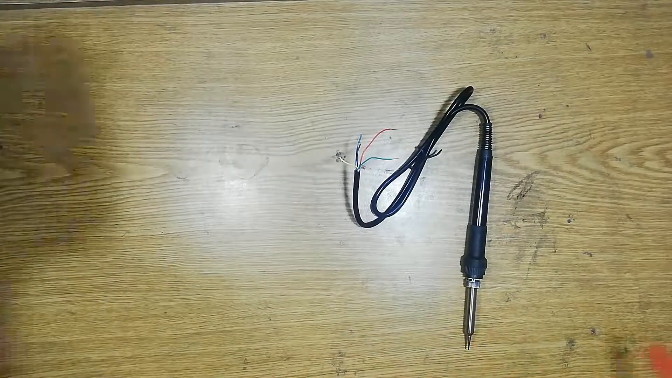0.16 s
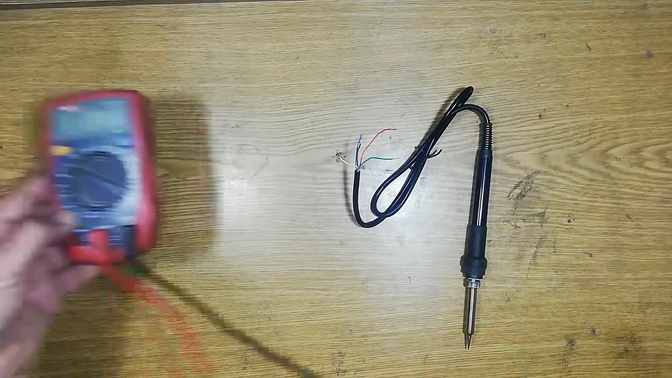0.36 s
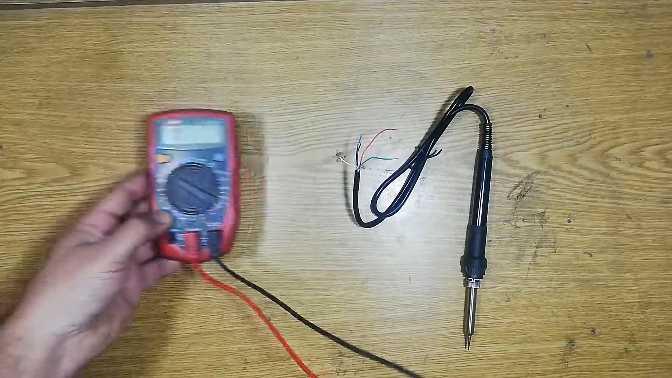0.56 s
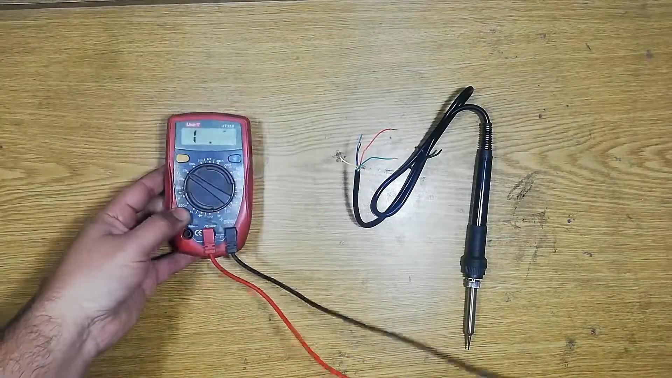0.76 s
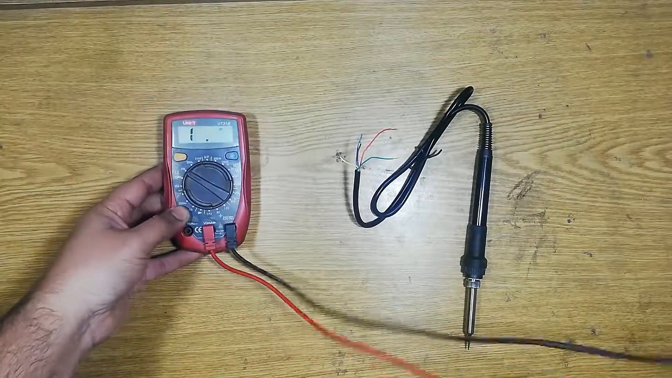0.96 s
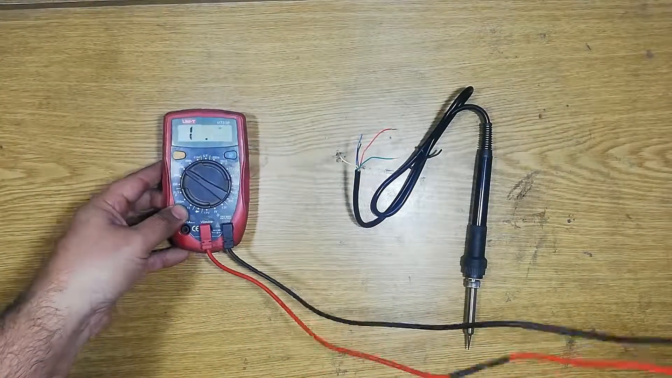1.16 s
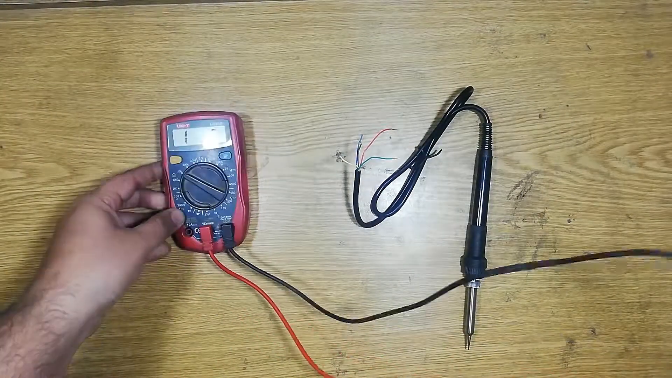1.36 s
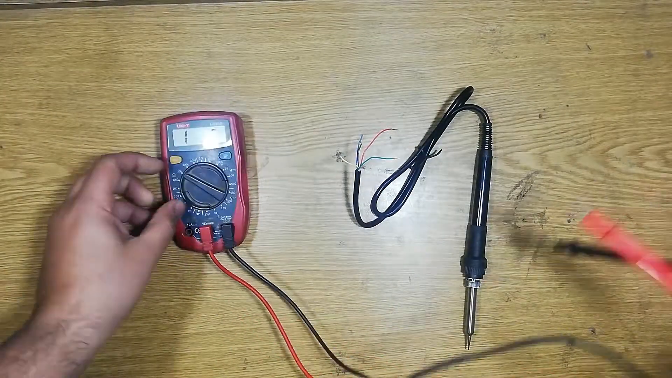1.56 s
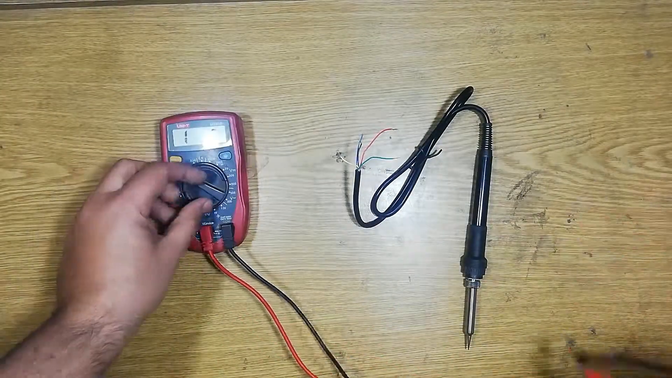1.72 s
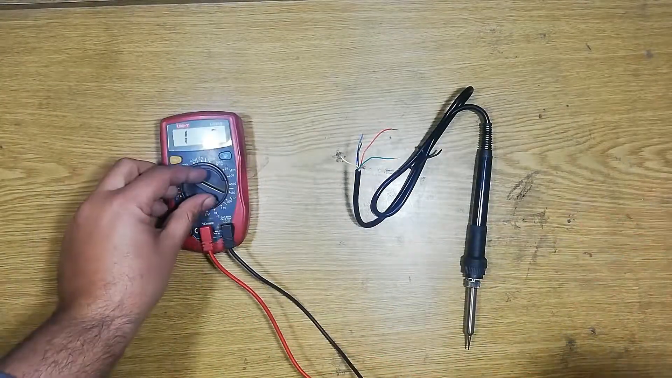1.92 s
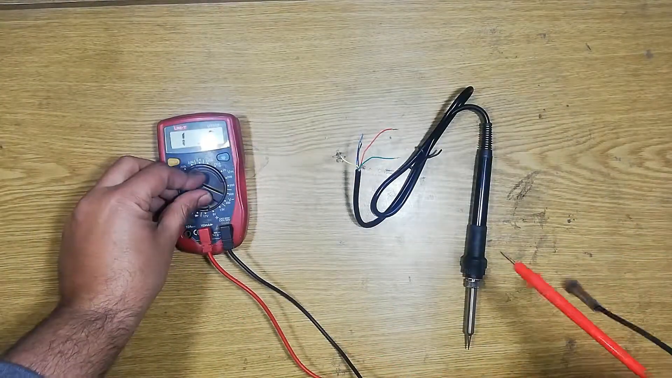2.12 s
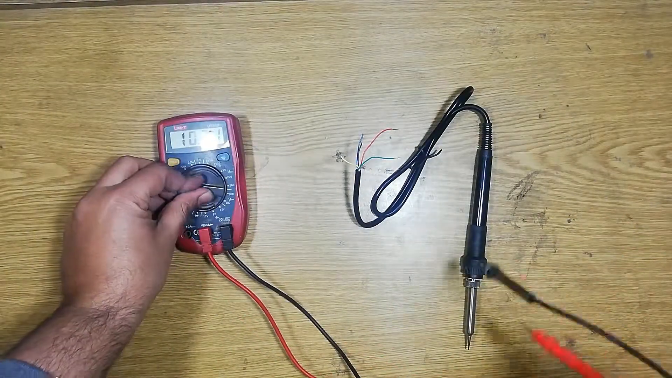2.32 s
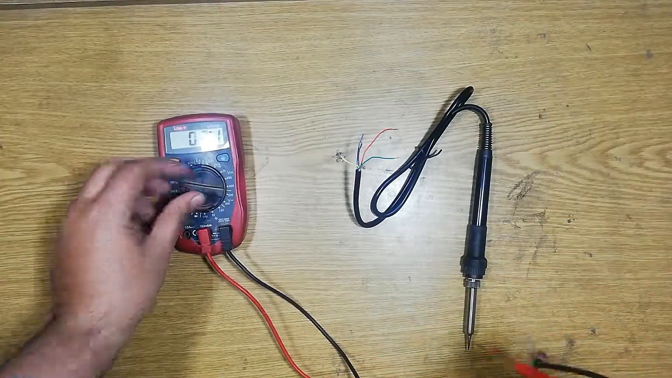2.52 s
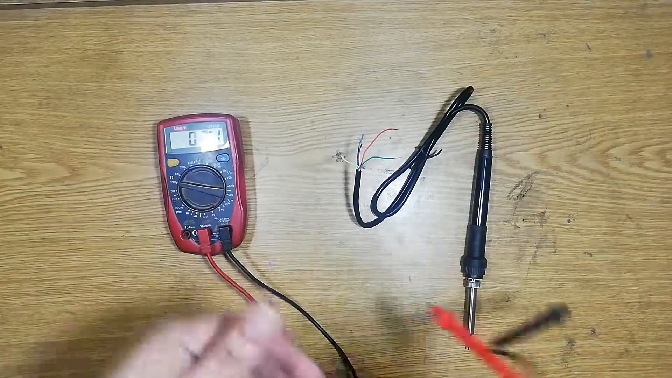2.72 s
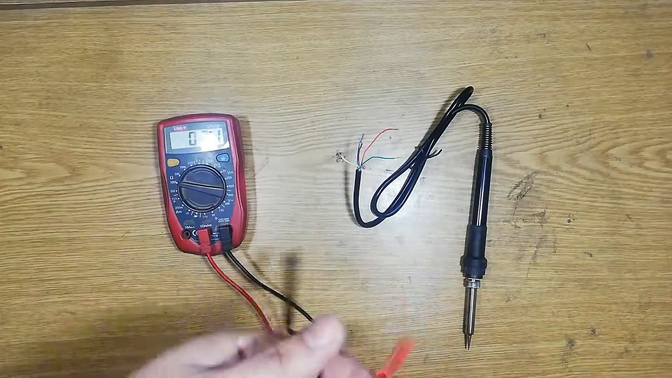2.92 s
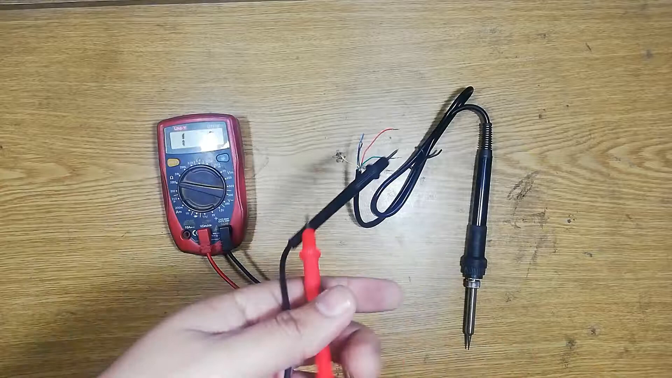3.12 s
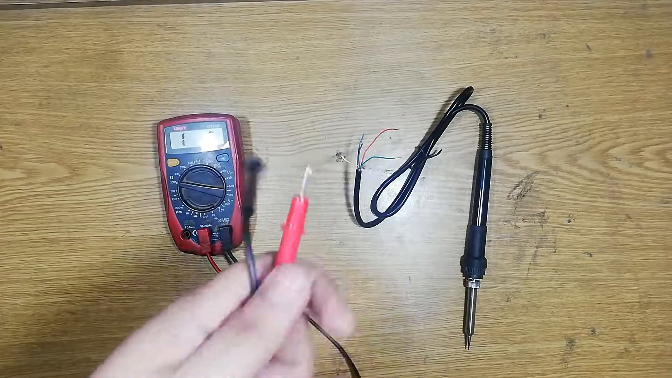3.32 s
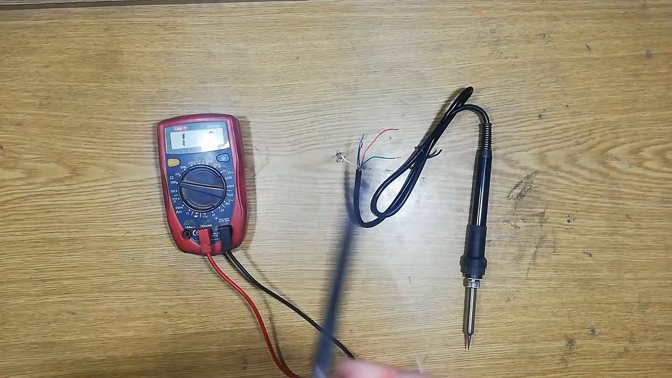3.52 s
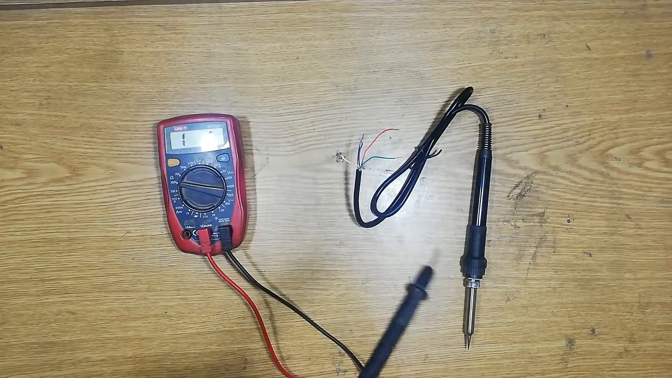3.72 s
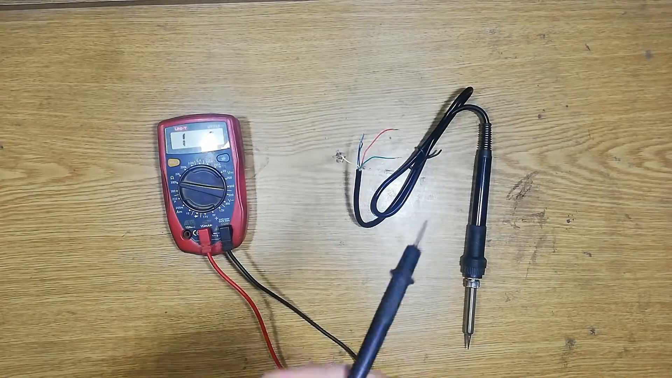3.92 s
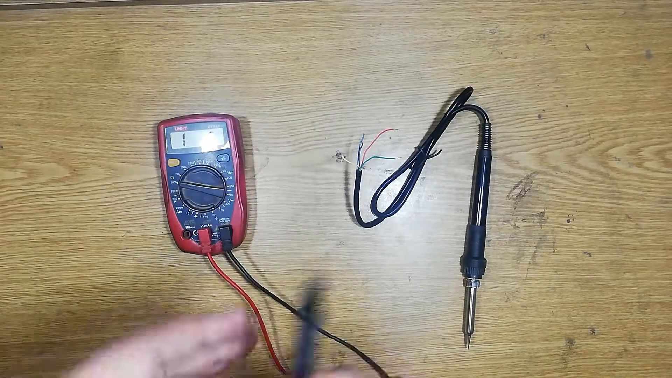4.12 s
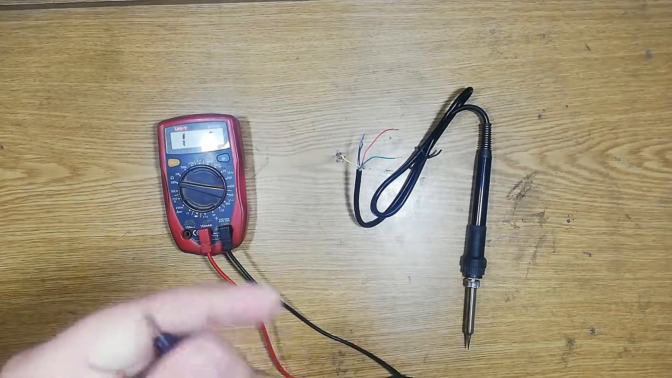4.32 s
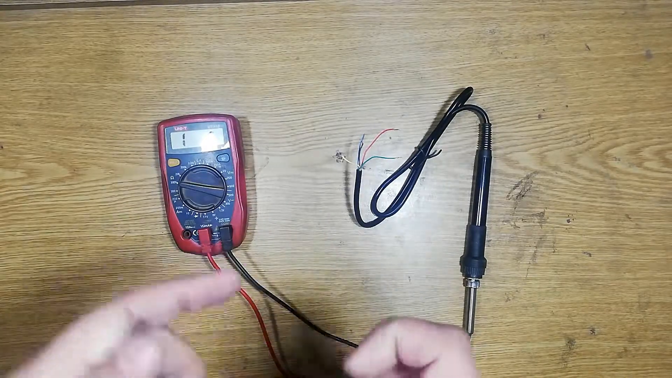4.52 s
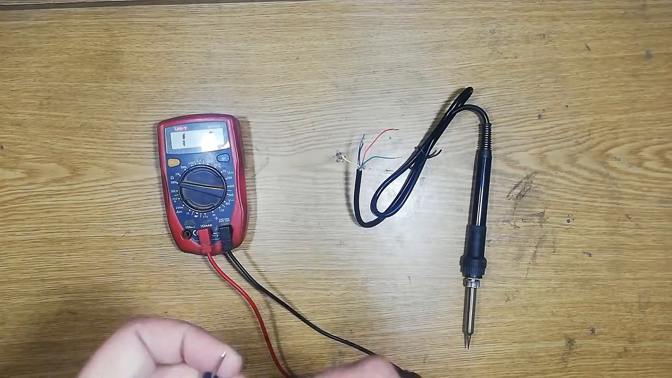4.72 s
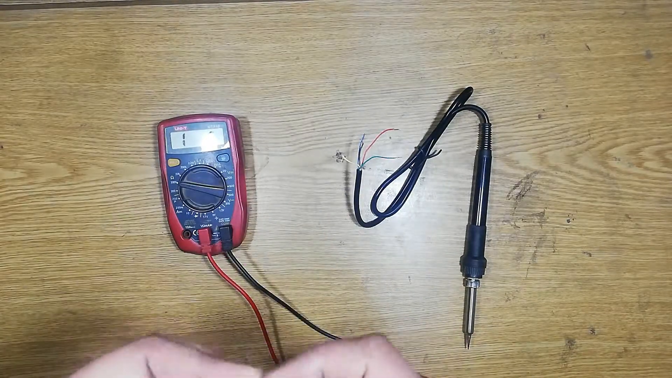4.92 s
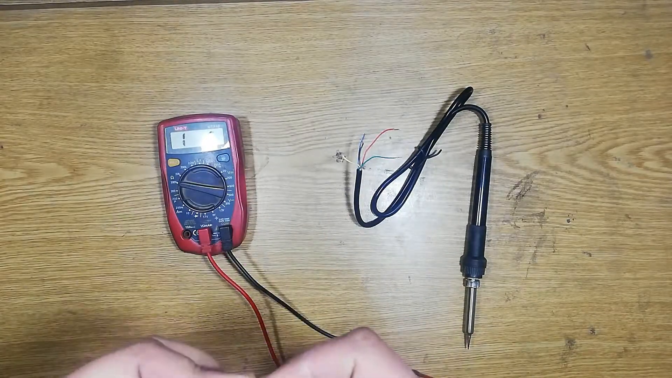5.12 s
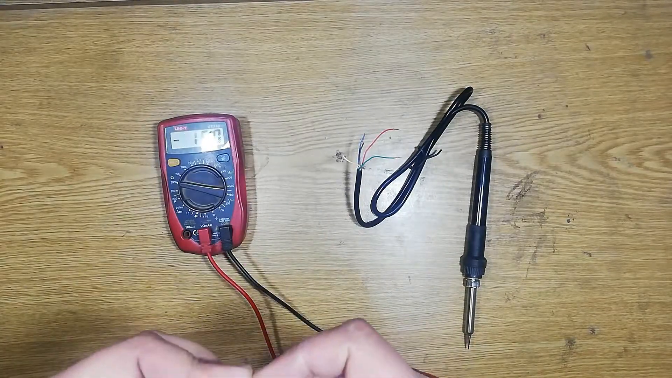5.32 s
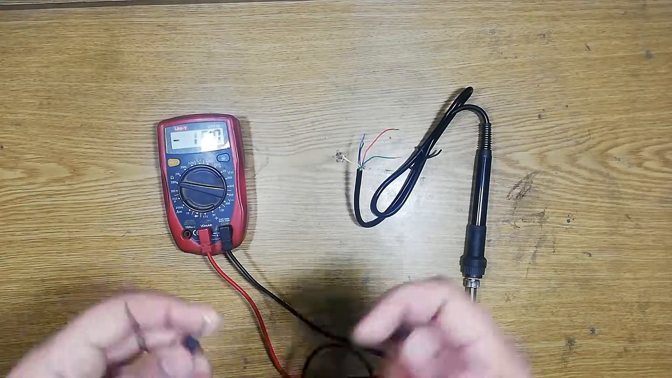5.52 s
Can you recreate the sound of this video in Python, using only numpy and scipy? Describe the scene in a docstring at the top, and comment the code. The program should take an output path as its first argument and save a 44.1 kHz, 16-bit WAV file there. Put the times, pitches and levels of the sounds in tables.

```python
"""A multimeter is set down on a wooden table and shoved: two booming knocks that overload the microphone.
The steel tips of its two dangling probes clink together; their plastic grips and the dial's detents snap.
Fingers and leads rub faintly over plastic. A small, hard room hums and reverberates.
Every sound arrives as a quick rising flam."""
import sys
import numpy as np
from scipy import signal
from scipy.fft import rfft, irfft, next_fast_len
from scipy.io import wavfile
from scipy.ndimage import uniform_filter1d

SR = 44100
rng = np.random.default_rng(int(sys.argv[2]) if len(sys.argv) > 2 else 0)


def digitize_waveform(pressure):
    """Quantize a signal to 16-bit integers and store it at the path in sys.argv[1].

    Rows of a 2-D input are taken as channels; values are limited to [-1, 1].
    """
    field = np.atleast_2d(pressure).T
    bounded = np.clip(field, -1, 1)
    quanta = np.round(bounded * 32767).astype(np.int16)
    wavfile.write(sys.argv[1], SR, quanta)


N = 245267
T = np.arange(SR * 2 // 5) / SR  # time axis of one event, s


def amp(db):
    """Decibels to gain."""
    return 10 ** (np.asarray(db) / 20)


def unit_rms(x):
    """Scale to rms 1."""
    return x / np.sqrt(np.mean(x ** 2) + 1e-20)


def curve(points, hz):
    """Interpolate (freq_hz, value) points on a log frequency axis."""
    freqs_hz, values = np.transpose(points)
    return np.interp(np.log(hz + 1), np.log(freqs_hz + 1), values)


def filtered(x, response):
    """Apply the gain response(hz) by FFT."""
    size = x.shape[-1]
    padded = next_fast_len(size + 2048)
    hz = np.fft.rfftfreq(padded, 1 / SR)
    return irfft(rfft(x, padded) * response(hz), padded)[..., :size]


def decay(t60_s):
    """Envelope falling 60 dB in t60_s."""
    return np.exp(-np.log(1000) * T / t60_s)


def ring(hz, t60_s, attack_s=0.0004):
    """A short-wave mode, reaching each channel at its own phase."""
    onset = 1 - np.exp(-(T / attack_s) ** 2)
    return np.sin(2 * np.pi * (hz * T + rng.random((2, 1)))) * decay(t60_s) * onset


def add(track, start_s, sound, pan_db=0):
    """Mix in a stereo sound; pan_db is left over right."""
    start = round(start_s * SR)
    part = sound[:, max(-start, 0):N - start] * amp([[pan_db / 2], [-pan_db / 2]])
    track[:, max(start, 0):][:, :part.shape[1]] += part


# left-right likeness: freq_hz, correlation
STEREO_CORRELATION = [(100, 0.99), (250, 0.91), (500, 0), (1500, 0.77), (4000, 0)]

def stereo_noise(response, size=len(T)):
    """Coloured noise of rms 1, its channels most alike in the bass."""
    def mid_side_gains(hz):
        angle = np.arccos(np.clip(curve(STEREO_CORRELATION, hz), -1, 1)) / 2
        return response(hz) * [np.cos(angle), np.sin(angle)]

    mid, side = filtered(rng.standard_normal((2, size)), mid_side_gains)
    return unit_rms(np.array([mid + side, mid - side]))


# quiet room spectrum: freq_hz, density_db
HUM_SPECTRUM = [(15, -40.5), (25, -18), (53, -3.5), (86, -15.5), (118, -1), (150, -18), (176, -11),
                (354, -23.5), (475, -32.5), (1120, -27.5), (1390, -32.5), (1760, -30), (3630, -34.5),
                (4040, -32.5), (15000, -39.5)]

def room_hum(level_db=-56.5):
    """The room's steady low noise."""
    return amp(level_db) * stereo_noise(lambda hz: amp(curve(HUM_SPECTRUM, hz)), N)


# reverberation time: freq_hz, t60_s
ROOM_DECAY = [(200, 0.25), (2500, .3), (7000, 0.27), (12000, 0.24), (16000, 0.49)]

def in_room(sound, wet_db, build_s=0.00057):
    """Add a diffuse tail, new for each sound since the source keeps moving."""
    hz, t, spectra = signal.stft(rng.standard_normal((2, len(T))), SR, nperseg=256)
    spectra = spectra * np.exp(-np.log(1000) * t / curve(ROOM_DECAY, hz)[:, None])
    tail = signal.istft(spectra, SR, nperseg=256)[1][:, :len(T)]
    tail *= 1 - np.exp(-(T / build_s) ** 2)
    tail /= np.linalg.norm(tail[0])
    return sound + amp(wet_db) * signal.fftconvolve(sound, tail, axes=1)[:, :len(T)]


# rubs on plastic: peak_s, level_db, sigma_s, centre_hz
RUB_EVENTS = [(0.661, -59, .13, 1886), (1.809, -60, 0.061, 2030), (2.457, -40, .025, 2041),
              (4.352, -60.5, .035, 12170), (4.516, -59.5, 0.043, 11830), (4.759, -64.5, 0.13, 1840)]

def plastic_rubs(half_width_oct=0.25, grain_db=3):
    """Fingers and leads slide over plastic: swells of hiss, grainy with tiny slips."""
    track = np.zeros((2, N))
    t = np.arange(-SR // 3, SR // 3) / SR
    for peak_s, level_db, sigma_s, centre_hz in RUB_EVENTS:
        band = lambda hz: 1 / (1 + (np.log2((hz + 1) / centre_hz) / half_width_oct) ** 2)
        hiss = stereo_noise(band, len(t))
        slips = unit_rms(uniform_filter1d(rng.standard_normal(len(t)), size=200))
        rub = unit_rms(hiss * amp(grain_db * slips))
        swell = np.exp(-(t / sigma_s) ** 2 / 2)
        add(track, peak_s + t[0], amp(level_db) * rub * swell)
    return track


def burst(low_hz, high_hz, t60_s=0.022):
    """A band of quickly decaying noise."""
    band = signal.butter(N=4, Wn=[low_hz, high_hz], btype="band", fs=SR, output="sos")
    noise = signal.sosfilt(band, rng.standard_normal((2, len(T))) * decay(t60_s))
    return noise * np.linalg.norm(decay(t60_s)) / np.linalg.norm(noise, axis=1, keepdims=True)


# dial detents and probe grips: start_s, level_db, mode_hz, ring_db, top_hz, pan_db
SNAP_EVENTS = [(1.9479, -31, 4140, -10, 10440, -8.5), (2.3037, -7.5, 2150, 0, 6000, -2.5),
               (2.3046, -6.5, 3590, -5.5, 12000, -2.5), (2.6045, -25, 2904, 9, 4890, -1),
               (2.7635, -33, 2050, 1.5, 2406, 1.5), (2.806, -28.5, 2350, -10.5, 9583, 4.5),
               (3.352, -14.5, 4704, -11, 10300, -2.5), (3.3525, -17.5, 2010, 1, 2550, -5),
               (3.981, -32, 4523, -5, 8110, 5.5), (4.9375, -23, 9815, -16, 13560, -4.5),
               (5.4952, -22, 4850, 9.5, 8606, -1.5)]

def plastic_snaps(gain_db=3, thud_db=-1.5, thud_db_per_db=2.4, wet_db=-7, wet_db_per_oct=5):
    """Dense, damped plastic modes, the lowest ringing; the loudest snaps overload into a short low thud."""
    track = np.zeros((2, N))
    for start_s, level_db, mode_hz, ring_db, top_hz, pan_db in SNAP_EVENTS:
        snap = burst(0.88 * mode_hz, top_hz) + amp(ring_db) * ring(mode_hz, t60_s=0.012)
        low_thud = in_room(burst(low_hz=170, high_hz=2000), wet_db=-12)
        low_thud *= amp(thud_db + thud_db_per_db * level_db)
        room_db = wet_db + wet_db_per_oct * np.log2(top_hz / mode_hz)  # broad snaps fill the room more
        add(track, start_s, amp(level_db + gain_db) * in_room(snap, room_db) + low_thud, pan_db)
    return track


# modes of the two steel tips: pitch_hz, level_db, t60_s
FIRST_TIP_MODES = [(3106, 0.5, 0.017), (5106, -2, 0.014), (7564, 5.5, 0.013), (11063, 1, 0.024),
                   (14954, -22.5, 0.024)]
SECOND_TIP_MODES = [(8085, 0, 0.032), (11620, 0.002, .02)]

def steel_tips(second_tip_db, lowest_hz, tilt_db_per_oct, pivot_hz=9000, detune=0.022):
    """Both tips ring in close mode pairs; a touch near the point leaves the low modes still."""
    first, second = np.zeros((2, 2, len(T)))
    for tip, modes in (first, FIRST_TIP_MODES), (second, SECOND_TIP_MODES):
        for hz, level_db, t60_s in modes:
            tilt_db = tilt_db_per_oct * np.log2(max(hz, lowest_hz) / pivot_hz)
            low_cut = 1 / np.hypot(1, (lowest_hz / hz) ** 4)
            lower_hz, upper_hz = hz * (1 + detune * rng.random(2) * [-1, 1])
            pair = (ring(lower_hz, t60_s) + ring(upper_hz, t60_s)) / np.sqrt(2)
            tip += amp(level_db + tilt_db) * low_cut * pair
    return (first + amp(second_tip_db) * second) / np.hypot(1, amp(second_tip_db))


# steel-on-steel crack: freq_hz, density_db
CRACK_SPECTRUM = [(400, -31), (2200, -28), (3500, -13.5), (6000, -7), (9000, 1), (12000, 1), (13300, -14.5),
                  (15500, -12.5)]
# tip touches: start_s, level_db, second_tip_db, lowest_hz, tilt_db_per_oct, glance_db, pan_db
CLINK_EVENTS = [(-0.025, -30.5, 6, 4000, -7.5, -2.5, -2.5), (0.2162, -34.5, -5, 7060, -5.5, -15.5, -3),
                (0.2699, -36, -14.5, 7300, -3, -16, 2), (0.5613, -36, -7.5, 6500, 14, -12.5, 2.5),
                (0.8863, -6, 1.5, 4000, 2, -6.5, -1.5), (0.93, -18, 7.5, 2450, 0, -2, -5),
                (1.036, -20.5, -11, 3900, -6, -5.5, -2), (1.1507, -17.5, -6, 4700, 1.5, -21.5, -4.5),
                (1.156, -38.5, -14.5, 4812, -24, -16.5, -1.5), (1.3892, -10, 14, 6475, -14, -6, -5),
                (1.8405, -26.5, -6, 7876, -31, -12.5, 5.5), (1.8448, -19, -1.5, 7326, -13, -11, -4.5),
                (2.5115, -16.5, -14, 2020, 2, -4, -0.5), (2.5687, -30.5, -2, 4200, -1, -4.5, -1.5),
                (2.8058, -18, 6.5, 3440, 5.5, -6.5, 2), (2.8841, -31.5, -0.5, 7540, 12.5, -5.5, -5.5),
                (2.9741, -39, 10, 5947, 1, -9, 0.5), (3.094, -27, 4.5, 5500, 10, -17, -6),
                (3.1054, -12.5, 10, 2789, 9, -12, 0.5), (3.1903, -34.5, -1.5, 6575, 12, -13, -7.5),
                (3.622, -27, -4.5, 7000, 4.5, -12, -3.5)]

def probe_clinks(steel_db=10.5, crack_db=16, echo_s=0.0113, echo_db=-16.5):
    """The tips collide, with more crack when glancing; the nearest hard surface echoes each clink."""
    track = np.zeros((2, N))
    for start_s, level_db, second_tip_db, lowest_hz, tilt_db_per_oct, glance_db, pan_db in CLINK_EVENTS:
        steel = steel_tips(second_tip_db, lowest_hz, tilt_db_per_oct)
        impact = rng.standard_normal((2, len(T))) * decay(t60_s=0.038)
        crack = filtered(impact, lambda hz: amp(curve(CRACK_SPECTRUM, hz)))
        clink = amp(level_db) * (amp(steel_db) * steel + amp(crack_db + glance_db) * crack)
        add(track, start_s, in_room(clink, wet_db=-6.5), pan_db)
        add(track, start_s + echo_s, amp(echo_db) * clink, pan_db)
    return track


# set down, shoved, pressed twice: start_s, force_db, contact_s, bounce_loss_db, settle_s
KNOCK_EVENTS = [(0.7881, 3.5, 0.001, 8, 0.053), (1.2975, 6, 0.00051, 1, .0605),
                (1.939, -29.5, 0.00828, 22, 0.029), (2.451, -20.5, .0038, 15.5, .0366)]

def case_contacts(taps=3, bounce_s=0.0072, settle_db=-7, settle_stretch=1.3):
    """The case's corners tap in quick, weakening bounces, then it settles flat."""
    for start_s, force_db, contact_s, bounce_loss_db, settle_s in KNOCK_EVENTS:
        for k in range(taps):
            yield start_s + k * bounce_s, force_db - k * bounce_loss_db, contact_s
        yield start_s + settle_s, force_db + settle_db, contact_s * settle_stretch


# wooden table top: pitch_hz, level_db, t60_s
TABLE_MODES = [(59.7, -25, 0.89), (110.36, -1.5, 0.42), (170.9, -9, 0.51), (198, 0, 0.2), (252, 0.5, 0.15),
               (303, -1.5, 0.054), (422, -17.5, 0.25), (462, -30.5, .3), (851, -18.5, 0.18),
               (868, -24.5, 0.7), (860, -26, 0.2), (1082, -24.5, 0.19), (1172, -19, 0.54), (1334, -19, .38),
               (1427, -28.5, 0.48)]

def table_boom(excitation):
    """The table's main modes, weighted by excitation(hz); each wave reaches the left a little earlier."""
    boom = np.zeros((2, len(T)))
    for hz, level_db, t60_s in TABLE_MODES:
        phase_rad = np.sqrt(hz / 3600) * np.array([[1], [-1]])
        boom += amp(level_db) * excitation(hz) * np.sin(2 * np.pi * hz * T + phase_rad) * decay(t60_s)
    return boom


# case rattling on wood: freq_hz, density_db
RATTLE_SPECTRUM = [(25, -22.5), (120, -1), (290, -6), (450, -7), (720, -19), (1000, -9), (1500, -12),
                   (2100, -13.5), (2800, -22.5), (4200, -13.5), (7000, -20), (11000, -14.5), (15000, -31)]

def meter_knocks(boom_db=-2, rattle_db=3, linger_db=-16, firm_s=0.0004, muffle_s=0.0049,
                 hold_s=0.18, choke_s=0.06):
    """Each contact rings the table, rattles the case and leaves dull, dense modes; all are cut short."""
    track = np.zeros((2, N))
    choke = np.exp(-(np.maximum(T - hold_s, 0) / choke_s) ** 2)
    for start_s, force_db, contact_s in case_contacts():
        # longer contact: less treble, weaker but longer rattle
        softness = contact_s / firm_s
        excitation = lambda hz: 1 / np.hypot(1, hz * contact_s)
        colour = lambda hz: amp(curve(RATTLE_SPECTRUM, hz)) * excitation(hz)
        rattle = stereo_noise(colour) * decay(t60_s=0.08 * softness ** 0.95) / np.hypot(1, softness)
        linger = stereo_noise(lambda hz: colour(hz) / np.hypot(1, hz / 2500)) * decay(t60_s=0.64)
        linger /= np.hypot(1, contact_s / muffle_s)
        blow = amp(boom_db) * table_boom(excitation) + amp(rattle_db) * rattle + amp(linger_db) * linger
        onset = 1 - np.exp(-T / contact_s)
        add(track, start_s, amp(force_db) * blow * onset * choke)
    return track


def scene():
    """Knocks, clinks, snaps and rubs over the room's hum."""
    return room_hum() + meter_knocks() + probe_clinks() + plastic_snaps() + plastic_rubs()


# weaker copies ahead of each sound: lead_s, level_db
FLAM_COPIES = [(0.017, -9), (0.0344, -24)]

def record(dry, knee=4, top_hz=15900):
    """Faint copies run ahead of each sound, overload flattens loud peaks, and the top is cut."""
    def flam(hz):
        return 1 + sum(amp(db) * np.exp(2j * np.pi * hz * lead_s) for lead_s, db in FLAM_COPIES)

    flammed = filtered(dry, flam)
    clipped = flammed / (1 + np.abs(flammed) ** knee) ** (1 / knee)
    return filtered(clipped, lambda hz: hz < top_hz)


dry = scene()
out = record(dry)
digitize_waveform(out)
```